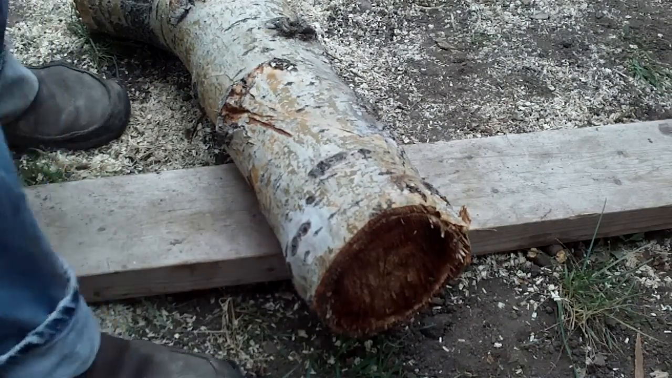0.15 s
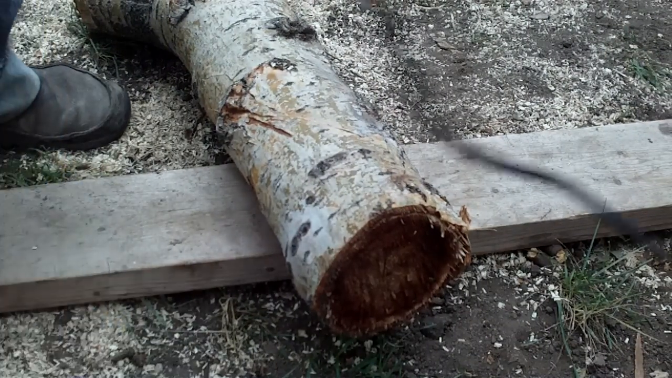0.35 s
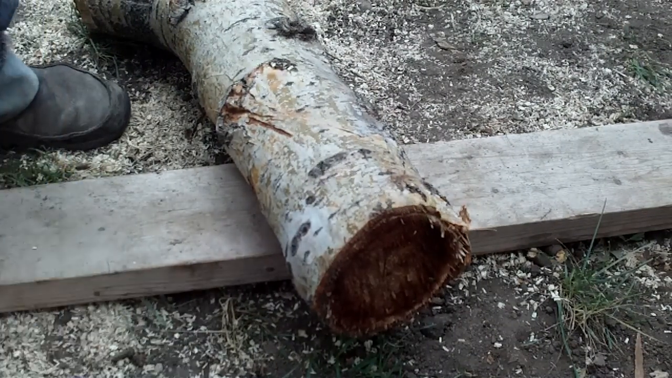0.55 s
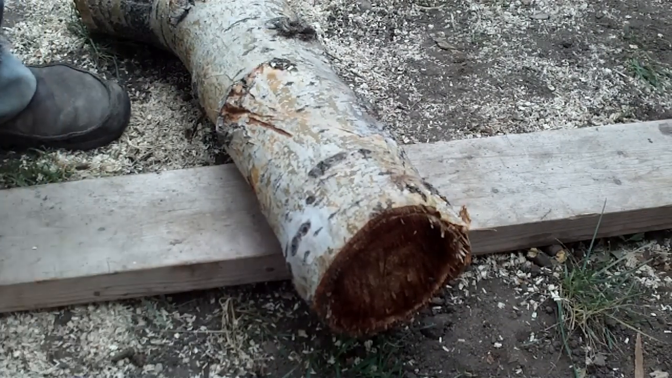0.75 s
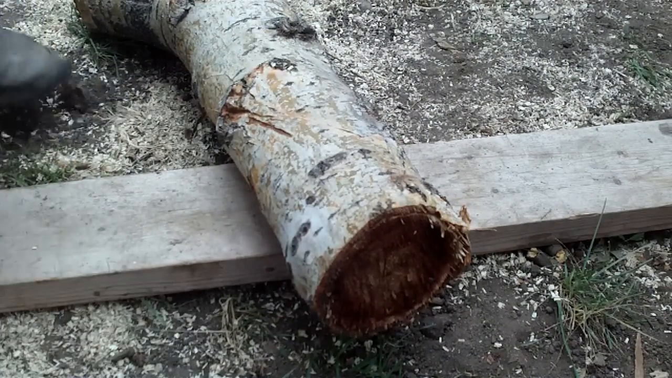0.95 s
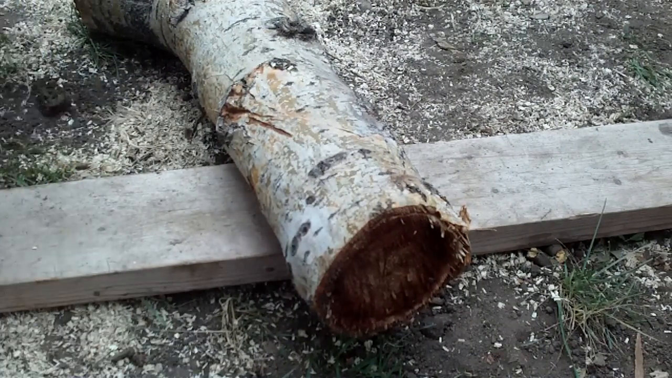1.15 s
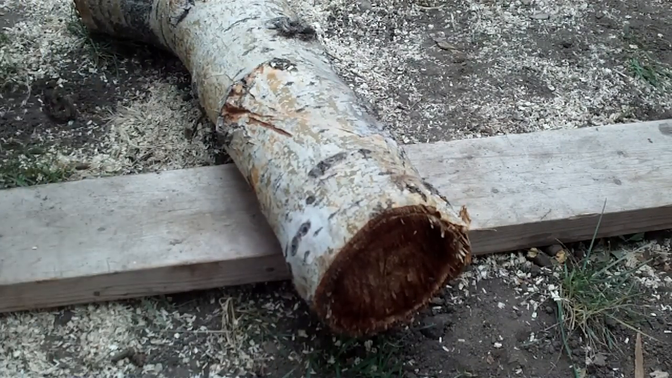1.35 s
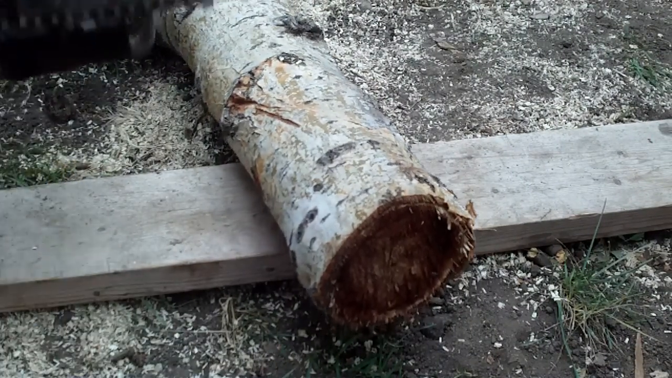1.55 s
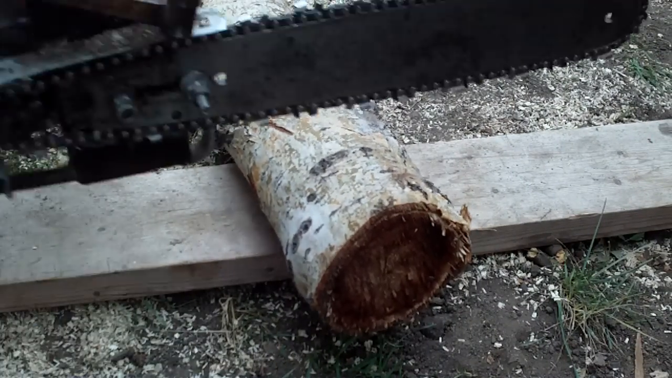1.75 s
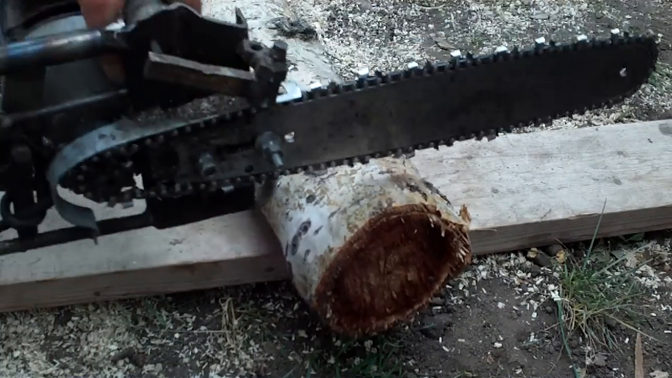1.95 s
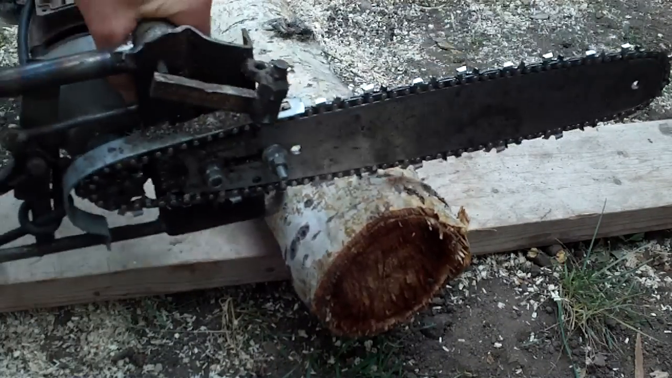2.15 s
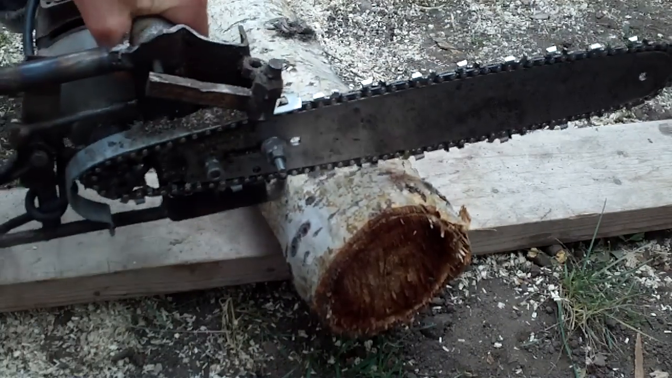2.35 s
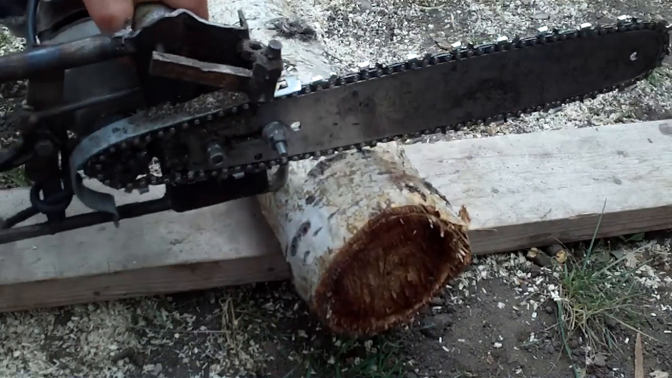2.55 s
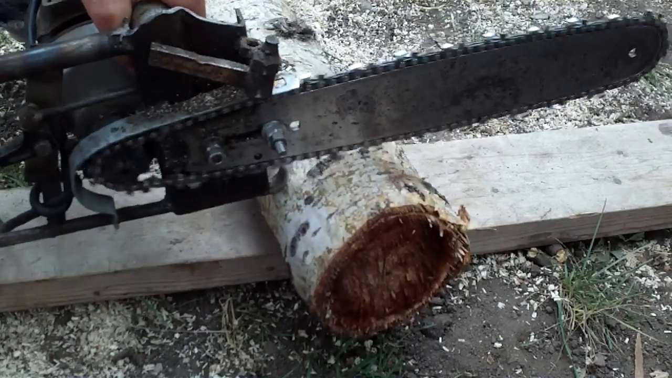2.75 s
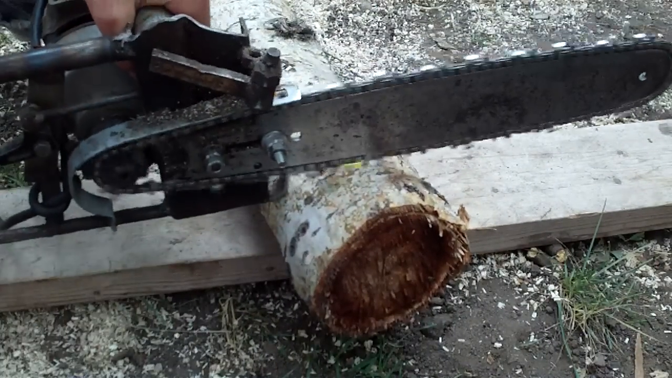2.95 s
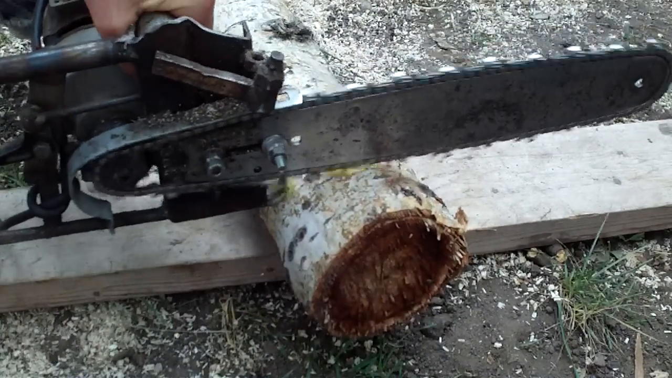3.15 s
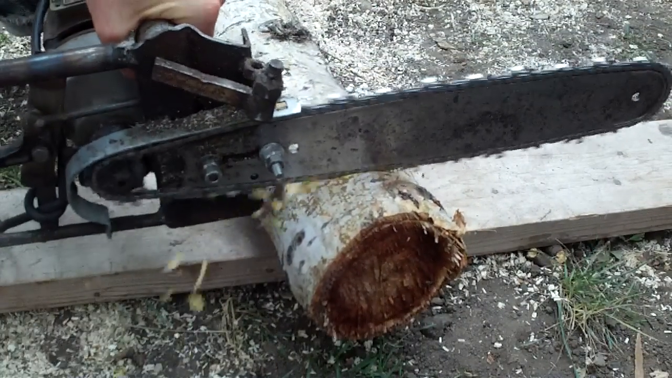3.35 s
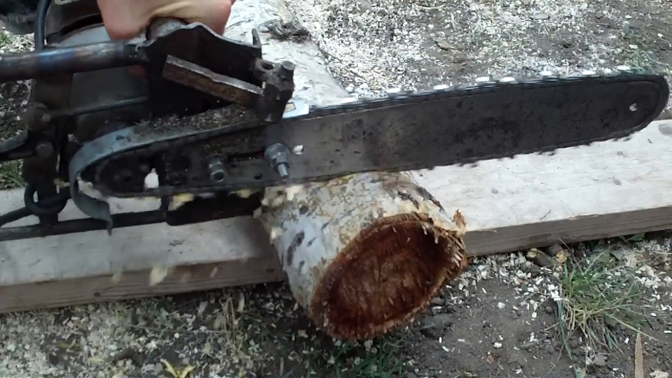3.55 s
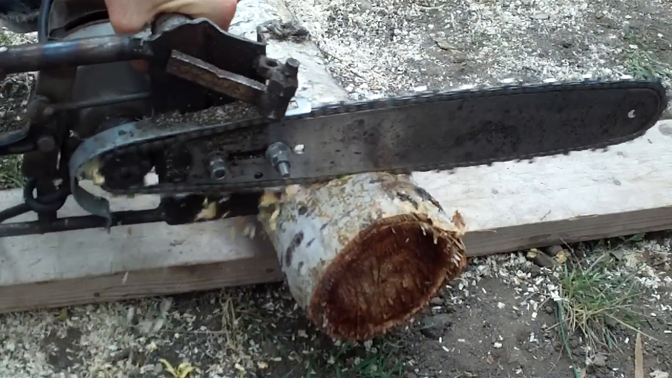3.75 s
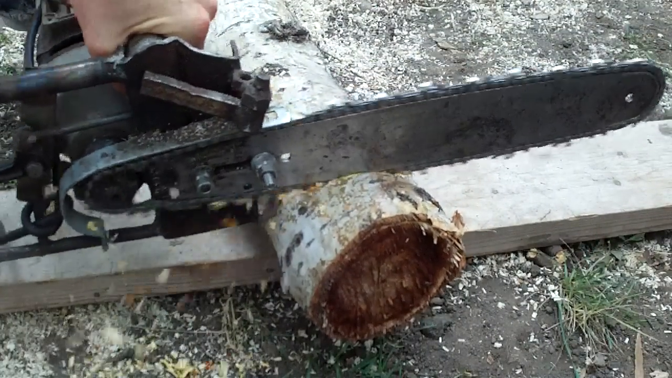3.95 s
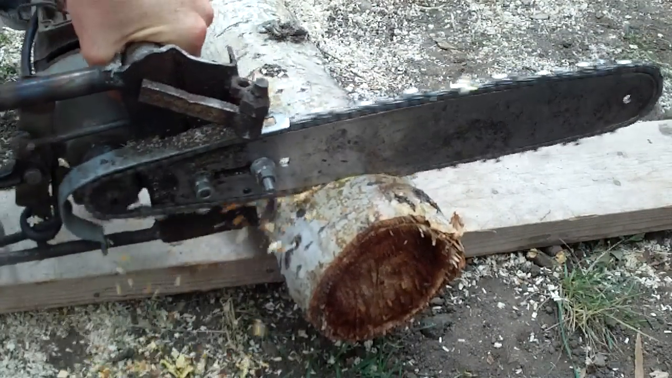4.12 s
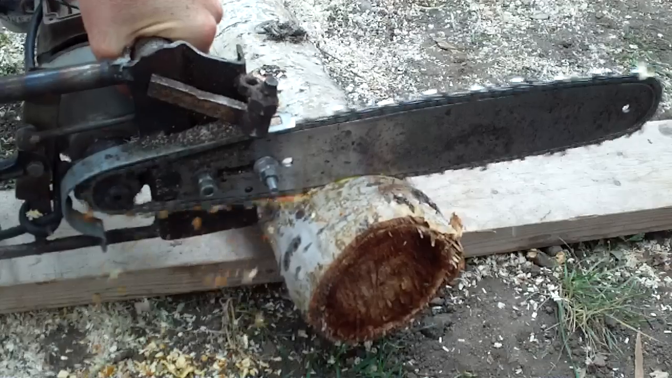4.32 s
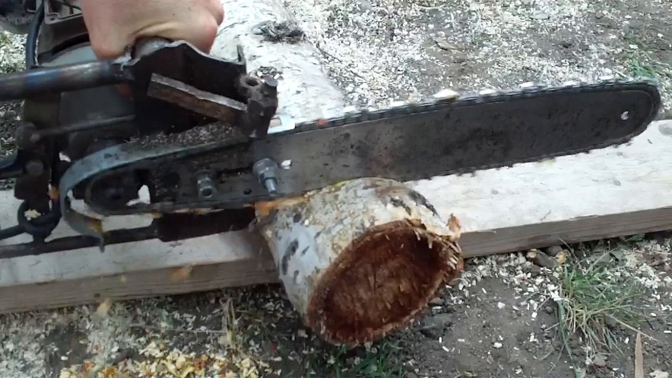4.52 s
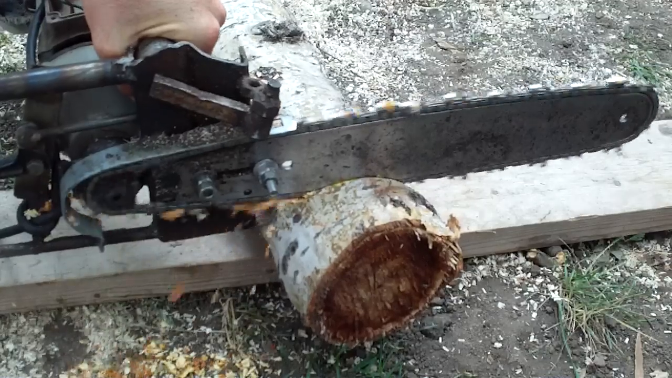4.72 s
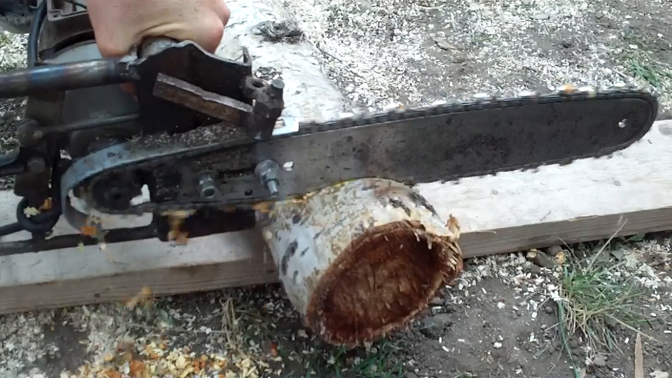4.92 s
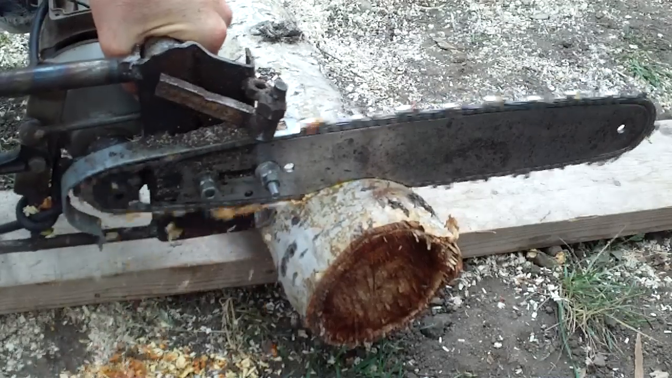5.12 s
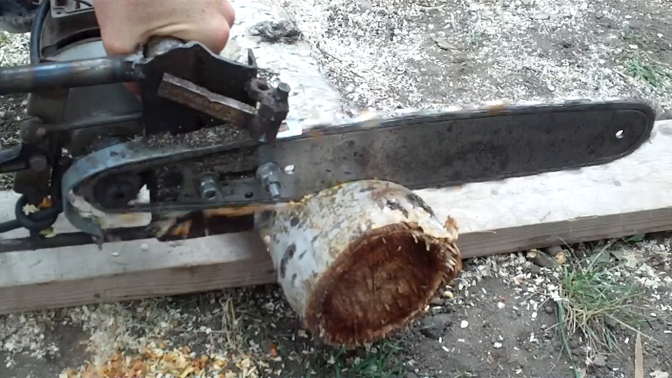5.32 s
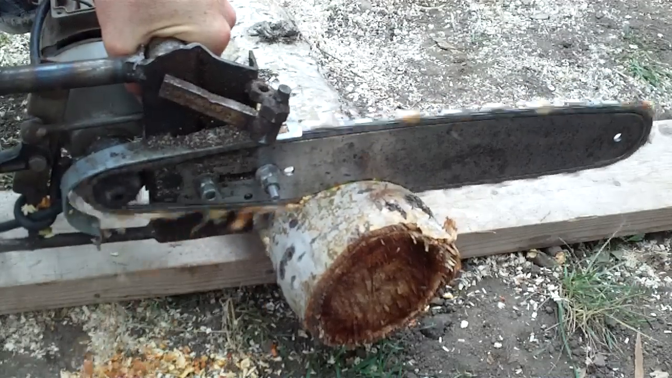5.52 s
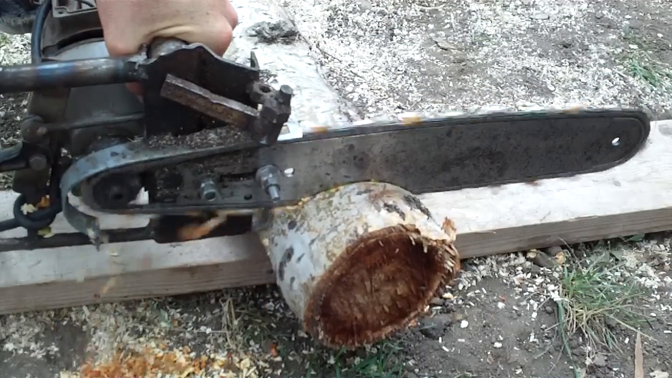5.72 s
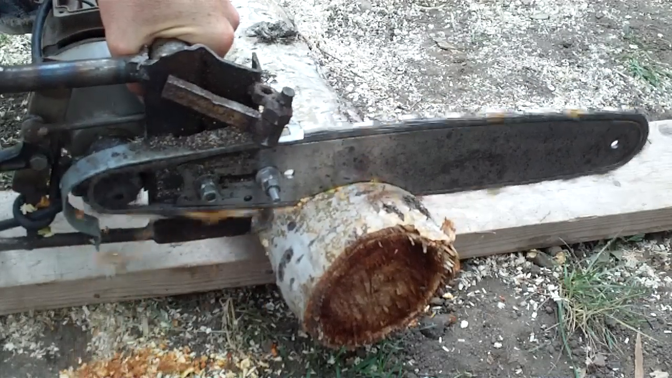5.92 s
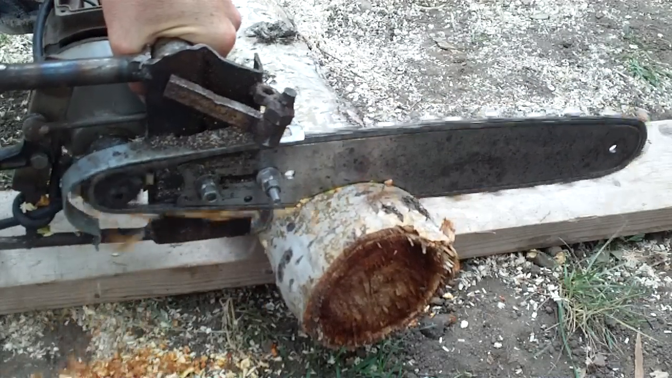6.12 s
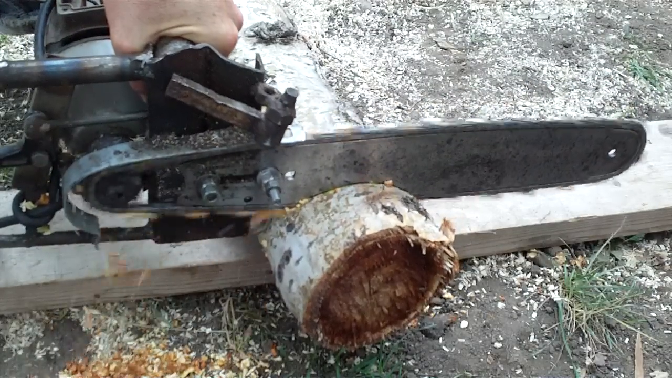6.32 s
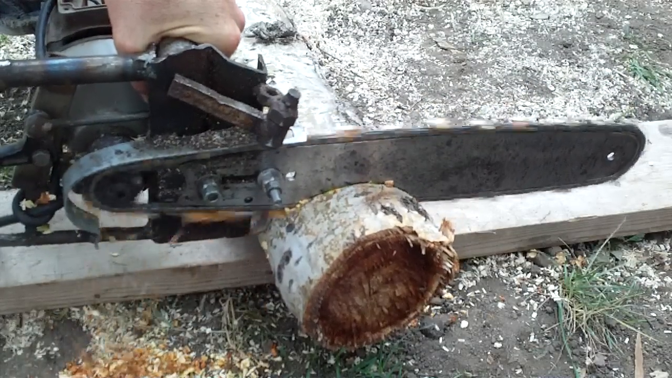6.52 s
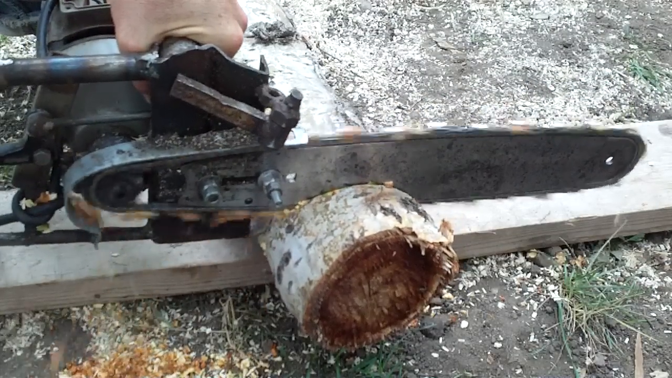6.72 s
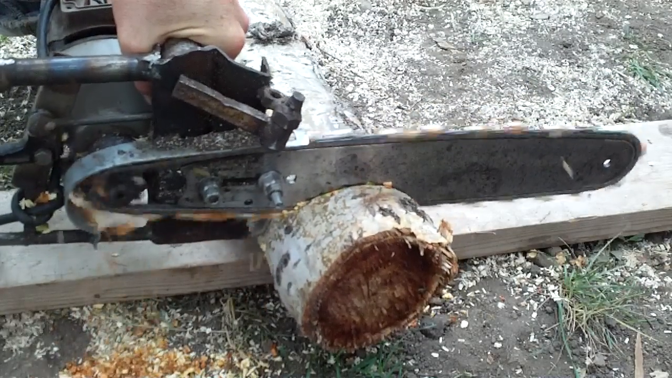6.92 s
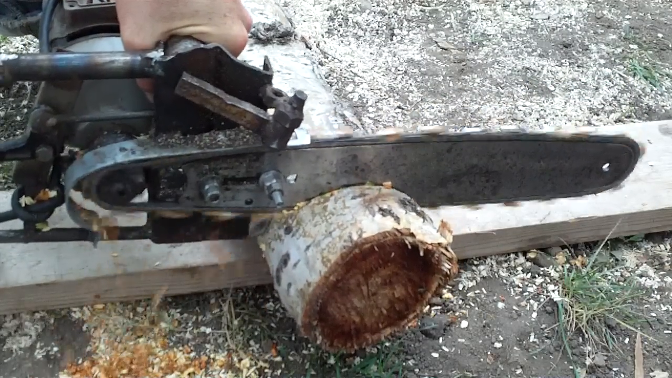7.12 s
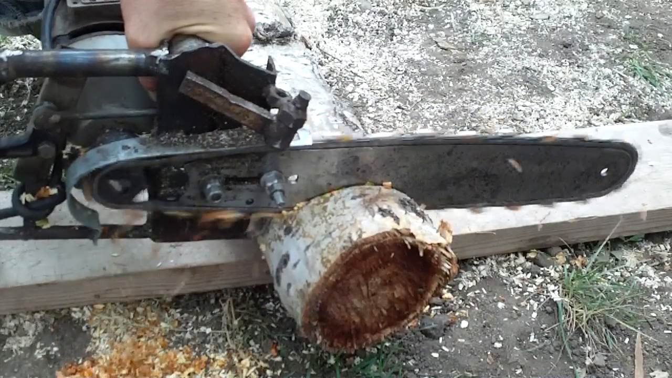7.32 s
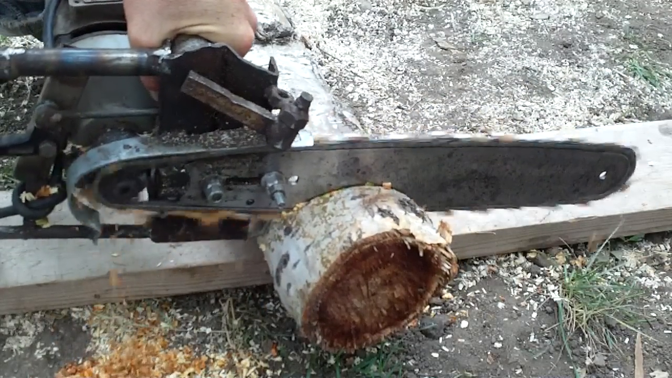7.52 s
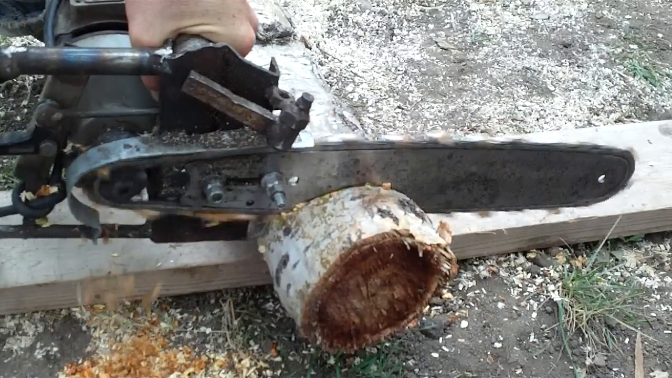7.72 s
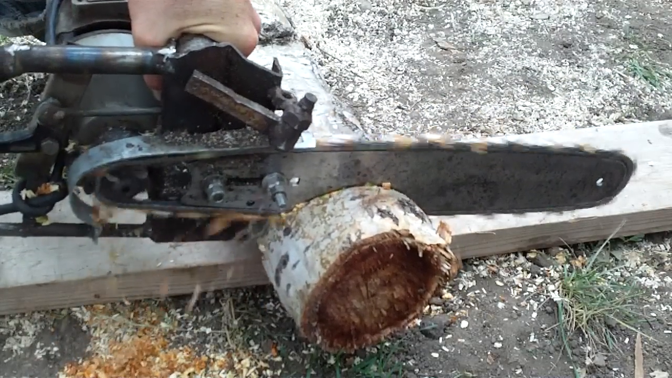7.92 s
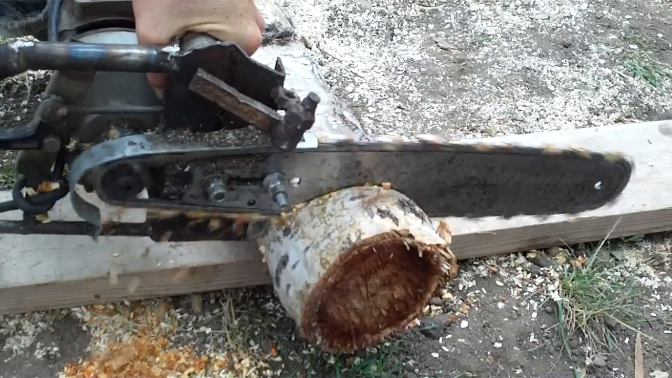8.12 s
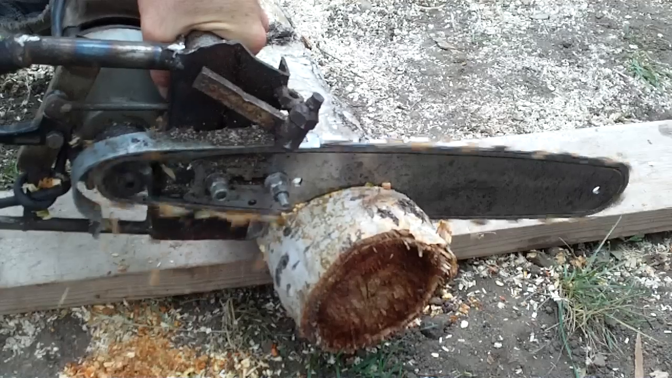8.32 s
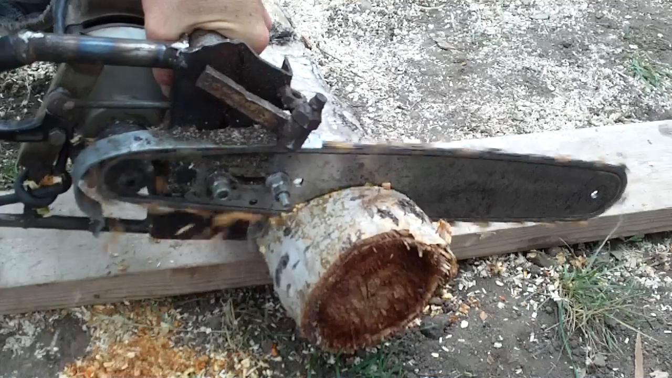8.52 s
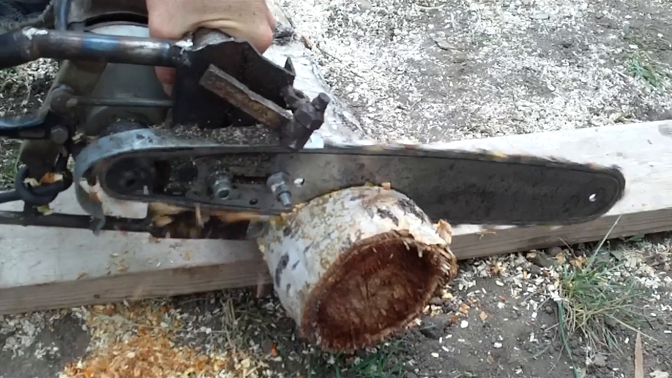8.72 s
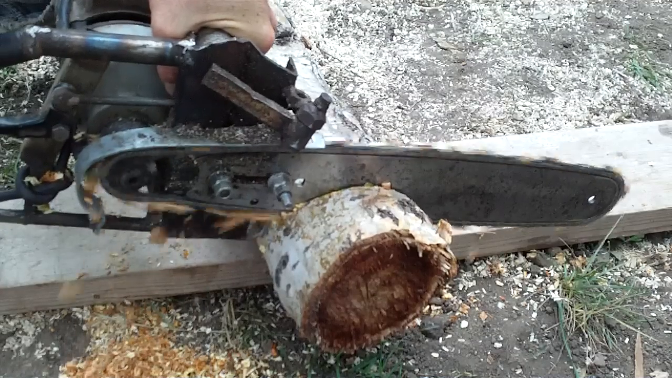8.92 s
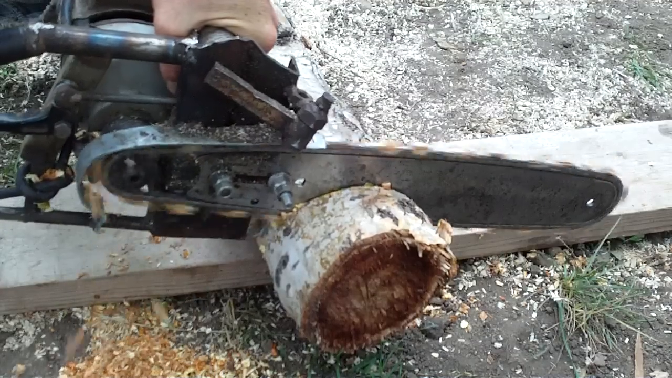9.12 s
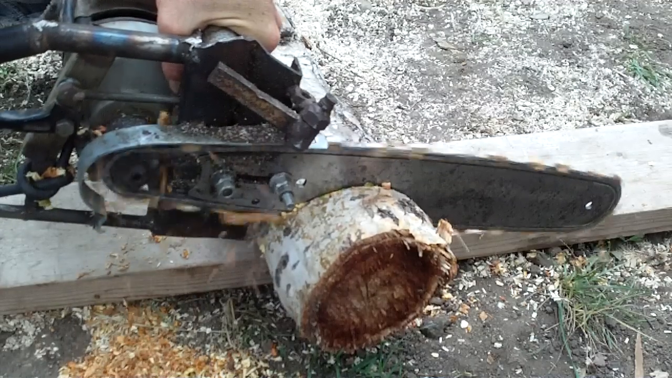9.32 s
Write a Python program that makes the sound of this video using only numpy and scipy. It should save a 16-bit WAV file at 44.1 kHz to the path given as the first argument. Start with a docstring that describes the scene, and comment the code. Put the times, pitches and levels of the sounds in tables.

```python
"""A generator idles in a yard, its hum swelling and fading irregularly throughout; far noise lies beneath.
First a homemade electric chainsaw is handled: filtered-noise clicks, ringing steel, rustle, sparrows' sine chirps.
At 2.7 s it is switched on: its motor runs up and whines on commutator, gear and shaft orders over rattle and hiss.
From 3.15 s the chain bites into a log: the pitch sags, the gear lines grow and the chain jolts. One microphone."""
import sys
import numpy as np
from scipy import signal
from scipy.fft import rfft, irfft, next_fast_len
from scipy.io import wavfile
from scipy.ndimage import uniform_filter1d, map_coordinates

SR = 44100
rng = np.random.default_rng(int(sys.argv[2]) if len(sys.argv) > 2 else 0)


def elevation(decibels):
    """Turn decibel levels (scalar or array-like) into linear amplitude ratios."""
    levels = np.asarray(decibels, float)
    return 10 ** (levels / 20)


def materialize(psi):
    """Save the field psi as 16-bit PCM at rate SR to the path in sys.argv[1].

    A 1-D psi becomes a single channel; in a 2-D psi each row is a channel.
    """
    bounded = np.clip(np.atleast_2d(psi).T, -1, 1)
    quanta = np.round(bounded * 32767).astype(np.int16)
    wavfile.write(sys.argv[1], SR, quanta)


N = 417186
T = np.arange(N) / SR
TOP_HZ = 16000
SWITCH_S, RUNUP_S = 2.702, 0.168  # switch-on, time constant of the run-up
FREE_HZ = 3357  # no-load commutator pitch, the aim of the run-up
BARS = 12  # commutator bars
SINCE_S = np.maximum(T - SWITCH_S, 1e-4)


def unit(x):
    """Scale to rms 1."""
    return x / np.sqrt(np.mean(x ** 2) + 1e-20)


def curves(rows):
    """One value per sample for each column after the time."""
    s, *cols = np.transpose(rows)
    return [np.interp(T, s, c) for c in cols]


def along(points, hz):
    """Read (Hz, dB) points on a log frequency axis."""
    f, db = np.transpose(points)
    return np.interp(np.log(hz + 1), np.log(f + 1), db)


def wobble(rate):
    """Smooth random curve, rate knots a second."""
    return map_coordinates(rng.standard_normal(int(N * rate / SR) + 4), [T * rate])


def coloured(x, spectrum):
    """Filter x through (Hz, dB) points, rms 1."""
    m = next_fast_len(N + 8192)
    f = np.fft.rfftfreq(m, 1 / SR)
    gain = elevation(along(spectrum, f)) * (f < TOP_HZ - 200)
    return unit(irfft(rfft(x, m) * gain, m)[:N])


def banded(count, lo_hz, hi_hz, order):
    """Burst of band noise, rms 1."""
    band = signal.butter(order, [lo_hz, min(hi_hz, TOP_HZ)], "bandpass", fs=SR, output="sos")
    return unit(signal.sosfilt(band, rng.standard_normal(count)))


def patchy(depth_db):
    """White noise with patches of random gain in time and frequency."""
    z = signal.stft(rng.standard_normal(N + 512), nperseg=512)[2]
    field = uniform_filter1d(rng.standard_normal(z.shape), size=5, axis=0)
    field = uniform_filter1d(field, size=10, axis=1)
    return signal.istft(z * elevation(depth_db * unit(field)), nperseg=512)[1][:N]


def tone(phase, db, flutter_db, blur_rad):
    """Sine with fluttering level and wandering phase."""
    level = np.sqrt(2) * elevation(db + flutter_db * wobble(35))
    return level * np.sin(phase + blur_rad * wobble(60) + rng.uniform(0, 2 * np.pi))


def motor_speed():
    """Commutator pitch [Hz]: exponential run-up, capped by the load of the cut."""
    # cap set by the load: (time [s], commutator pitch [Hz])
    loaded = [(3.3, 3250), (3.44, 3247), (3.66, 3169), (4.04, 3137), (4.17, 3094), (4.23, 3010),
              (4.5, 2962), (4.53, 2937), (4.76, 2910), (5.0, 2916), (5.14, 2920), (5.44, 2840), (5.5, 2796),
              (5.56, 2744), (5.65, 2797), (5.73, 2798), (5.84, 2783), (6.25, 2791), (6.39, 2821),
              (6.61, 2795), (6.82, 2773), (6.89, 2685), (6.94, 2677), (7.01, 2720), (7.12, 2743),
              (7.3, 2698), (7.37, 2660), (7.45, 2697), (7.62, 2671), (7.74, 2730), (7.83, 2733),
              (7.88, 2709), (8.26, 2652), (8.36, 2600), (8.45, 2677), (8.58, 2680), (8.74, 2628),
              (8.79, 2630), (8.89, 2656), (8.95, 2650), (9.08, 2729), (9.17, 2749), (9.29, 2758),
              (9.46, 2720)]
    return np.minimum(FREE_HZ * (1 - np.exp(-SINCE_S / RUNUP_S)), curves(loaded)[0])


def motor_whine(hz, phase, bite):
    """Commutator harmonics radiated by the casing, mesh harmonics by the gear cover."""
    # casing radiation of commutator lines: (frequency [Hz], level [dB])
    casing = [(500, -52), (950, -40), (1250, -16), (1600, -23), (1870, -22), (2120, -28), (2330, -34),
              (2450, -13.5), (2550, -24), (2660, -21.5), (2760, -20.5), (2800, -22.5), (2840, -20.5),
              (3000, -24), (3060, -18.5), (3120, -20.5), (3190, -21), (3250, -15.5), (3450, -28.5),
              (4200, -26), (5230, -25.5), (5450, -24.5), (5660, -19.5), (5720, -26), (5765, -51),
              (5810, -24.5), (5900, -22.5), (6000, -22), (6200, -27.5), (6300, -20.5), (6500, -21),
              (7100, -28), (7800, -25), (8050, -28), (8300, -28), (8750, -37.5), (9000, -33), (9250, -39),
              (9450, -31), (9750, -40), (10500, -38), (11000, -30.5), (11250, -36), (11600, -32),
              (11850, -41), (12000, -34), (12600, -40), (13000, -33), (13300, -38), (14000, -37),
              (14200, -28), (14600, -21.5), (14900, -29), (15600, -30), (15900, -50)]
    # gear cover radiation of mesh lines: (frequency [Hz], level [dB])
    gearbox = [(1500, -50), (1960, -24.5), (2050, -21.5), (2130, -28), (2190, -28.5), (2230, -53),
               (2310, -31), (2355, -21.5), (2430, -30), (3900, -44), (4050, -41), (4150, -37),
               (4250, -33.5), (4400, -40), (4700, -45), (4870, -37), (5900, -53), (6000, -38), (6150, -37),
               (6270, -48), (6430, -31), (6570, -43), (6750, -34), (7000, -50)]
    # brush seating as the saw is leant and rocked: (time [s], even over odd harmonics above the first [dB])
    seating = [(3.0, -1), (3.15, 5), (3.25, -27), (3.4, 5.5), (3.7, -2), (4.0, -0.5), (5.2, 4.5),
               (6.0, -2.5), (6.9, -1.5), (7.3, -12), (7.5, -10), (8.2, -0.5), (8.45, 2), (8.85, -6),
               (9.05, 3.5), (9.46, 5.5)]
    mesh = 0.75  # gear mesh over commutator pitch
    sharp_hz, sharpen = 2600, 0.94  # below this pitch upper harmonics weaken; power of speed
    lost_hz, width_hz, lost_db = 2901, 127, -14.5  # resonance damped by pressing on the log
    dull_db = sharpen * 20 * np.log10(np.minimum(hz / sharp_hz, 1))
    even_db, = curves(seating)
    lines = []
    for k in range(1, 6):
        seat_db = even_db * (0.65 if k % 2 == 0 else -0.35 * (k > 1))
        damp_db = bite * lost_db * np.exp(-((k * hz - lost_hz) / width_hz) ** 2)
        lines.append((k, along(casing, k * hz) + (k - 1) ** 1.3 * dull_db + seat_db + damp_db))
    for k in range(1, 4):  # gear teeth sing under load
        lines.append((k * mesh, along(gearbox, k * mesh * hz) - 10 * (1 - bite) + dull_db))
    rising_db = -13.5 * np.exp(-SINCE_S / RUNUP_S)  # lines firm up over the run-up
    whine = np.zeros(N)
    for k, db in lines:
        whine += tone(k * phase, db + rising_db + 1.6 * wobble(2.514), 1.31, 0.37 * k) * (k * hz < TOP_HZ)
    return whine


def shaft_lines(hz, phase, rattle_db):
    """Weak multiples of the shaft rate, slowly wavering, louder as the motor turns faster."""
    # orders of the shaft rate [1]
    faint = [1, 22, 26, 30, 38, 45, 50, 55, 57, 59]
    # their levels over the rattle [dB]
    faint_db = [-24.5, -19, -45, -28, -25, -30, -26, -18, -27, -27]
    out = np.zeros(N)
    for k, db in zip(faint, faint_db):
        level_db = db + rattle_db + 1.8 * wobble(1.22)
        out += tone(k * phase / BARS, level_db, 1.4, 0.5) * (k * hz / BARS < TOP_HZ)
    return out


def chain_rattle(ticks, rattle_db):
    """Chain and bar: patchy noise and cutter ticks through one spectrum."""
    # (frequency [Hz], relative density [dB per Hz])
    spectrum = [(40, -40), (80, -20), (200, -15.5), (335, -9), (393, -13.5), (807, -3), (979, -3.5),
                (1100, -14), (1340, -3), (1600, -13.5), (1880, -15.5), (2210, -14), (2600, -13),
                (3380, -34), (5720, -120)]
    return coloured(patchy(1.14) + 0.39 * ticks, spectrum) * elevation(rattle_db + 0.34 * wobble(13))


def air_hiss(hz, phase, bite, speed_db, ticks):
    """Fan and brush noise growing with speed, chips with lost speed, sparks at the start."""
    # (frequency [Hz], relative density [dB per Hz])
    spectrum = [(1060, -18.5), (1800, 2.5), (2600, -7.5), (2980, -3.5), (3410, -7.5), (4350, -5.5),
                (4720, -2.5), (5160, -6), (6300, -5), (7080, -9.5), (8250, -7), (9440, -10), (10800, -9),
                (13100, -14), (15500, -16)]
    fan = elevation(-19 + 2.84 * speed_db)
    chips = elevation(-33) * bite * 5 * (1 - hz / FREE_HZ)  # -33 dB at one fifth of speed lost
    # brush sparks under the starting current
    arcing = elevation(-34.5) * np.exp(-SINCE_S / RUNUP_S) * (1 - np.exp(-SINCE_S / 0.02))
    shaft = 1 + 0.13 * np.sin(phase / BARS)  # brushes rub harder once a turn
    noise = coloured(patchy(1.2) * shaft + 0.4 * ticks, spectrum)
    return noise * (fan + chips + arcing) * elevation(0.32 * wobble(14))


def saw():
    """Motor lines, chain rattle and hiss, all driven by the motor speed."""
    bite_s, bite_rise_s = 3.15, 0.29  # chain enters the log
    hz = motor_speed()
    phase = 2 * np.pi * np.cumsum(hz) / SR
    speed_db = 20 * np.log10(hz / FREE_HZ)
    bite = np.clip((T - bite_s) / bite_rise_s, 0, 1)
    rattle_db = -22 + 1.84 * speed_db  # dB at free speed, power of speed
    impulses = (rng.random(N) < 1800 / SR) * rng.standard_normal(N)  # about 1800 a second
    ticks = unit(impulses * elevation(0.59 * wobble(22)))  # cutters
    lines = motor_whine(hz, phase, bite) + shaft_lines(hz, phase, rattle_db)
    noise = chain_rattle(ticks, rattle_db) + air_hiss(hz, phase, bite, speed_db, ticks)
    return (T > SWITCH_S) * (lines + noise)


def clicks():
    """Short noise cracks ringing at their colour, duller ones starting softer, with a low knock."""
    # handling, switch, chain jolts: (time [s], relative level [dB], relative knock level [dB], colour [Hz])
    hits = [(0.1084, -48.5, 13, 4270), (0.588, -29, -17, 1620), (0.7142, -23, -6, 1780),
            (1.0449, -35, -27, 6460), (1.0649, -22, -39, 14900), (1.0864, -35, -21, 14800),
            (1.143, -42, -25, 9000), (1.153, -43, -25, 7000), (1.173, -47, -25, 11000),
            (1.207, -43, -25, 9000), (1.213, -48, -25, 11000), (1.233, -18.5, -22, 9500),
            (1.258, -48, -25, 9000), (1.482, -41.5, 13.5, 1500), (2.0847, -20, -34, 8500),
            (2.1095, -24.5, -13, 6270), (2.217, -34, -20, 2100), (2.251, -43, -20, 2100),
            (2.391, -40, 0, 1903), (2.4333, -36, -16, 3800), (2.4762, -37, -18, 9190),
            (2.4991, -33, -18, 9660), (2.5335, -43, -14, 8480), (2.584, -34, -16, 4390),
            (2.5965, -33, -18, 5660), (2.6928, -31, 2, 12300), (2.7051, -11, -25, 14300),
            (2.718, -34, -18, 9000), (2.728, -30, -14, 6800), (3.134, -11, -22, 3120),
            (4.4169, -1, -9, 5970), (4.5114, -10, -7, 5920)]
    t60_s, rise_cycles = 0.022, 15
    out, t = np.zeros(N + SR), np.arange(SR // 4) / SR
    for s, db, knock_db, hz in hits:
        crack = 1.54 * banded(len(t), 0.37 * hz, 3.4 * hz, order=1)
        crack += 1.7 * banded(len(t), 0.95 * hz, 1.06 * hz, order=1)
        crack *= (1 - np.exp(-t * hz / rise_cycles)) * elevation(-60 * t / t60_s)
        thud = banded(len(t), 350, 1140, order=2) + 0.77 * np.sin(2 * np.pi * 470 * t)
        knock = elevation(knock_db + 2.0 - 60 * t / 0.064) * thud * (1 - np.exp(-t / 0.003))
        out[round(s * SR):][:len(t)] += elevation(db - 11) * (crack + knock)
    return out[:N]


def clanks():
    """Blows on the steel frame: decaying modes, a noise crack and chattering slack links."""
    # (time [s], relative level [dB])
    blows = [(1.641, -9.5), (1.662, -18)]
    # frame modes: (frequency [Hz], mean relative level [dB], t60 [s])
    steel = [(4500, -21, 0.13), (5920, -11, 0.11), (7070, -1, 0.06), (7560, -3.5, 0.082), (9140, -2, 0.14),
             (10270, -35, 0.17), (11100, -28, 0.11), (12040, -17, 0.071), (12420, -0.5, 0.047),
             (12950, -23, 0.08), (13570, -5, 0.044)]
    out, t = np.zeros(N + SR), np.arange(SR // 4) / SR
    rise = 1 - np.exp(-t / 0.0012)
    for s, db in blows:
        ring = np.zeros(len(t))
        for hz, level_db, t60_s in steel:
            ring += elevation(level_db + rng.normal(0, 2.6) - 60 * t / t60_s) * np.sin(2 * np.pi * hz * t)
        crack = banded(len(t), 1400, 16000, order=1) * elevation(-60 * t / 0.051)
        links = 0.32 * banded(len(t), 3500, 4700, order=2) * elevation(-60 * t / 0.11)
        out[round(s * SR):][:len(t)] += elevation(db - 10.5) * rise * (crack + links + 0.86 * ring)
    return out[:N]


def cover_plate():
    """Cover plate set ringing by the switch: decaying narrow-band noise."""
    hz, db, t60_s = 2400, -41, 0.45
    out, t = np.zeros(N), np.arange(SR // 4) / SR
    ring = elevation(db - 60 * t / t60_s) * banded(len(t), hz - 50, hz + 50, order=1)
    out[round(SWITCH_S * SR):][:len(t)] += ring
    return out


def birds():
    """Sparrows: curved, slightly hoarse sine whistles with a weak octave."""
    # (time [s], start [Hz], middle [Hz], end [Hz], relative level [dB])
    notes = [(.0, 6040, 5280, 4000, -51.5), (0.05, 3820, 4330, 4300, -57), (.912, 8400, 7850, 7760, -59),
             (1.025, 4000, 6030, 6500, -55), (1.258, 2800, 3050, 3100, -65),
             (1.427, 4600, 5900, 4000, -48.5), (1.515, 3970, 5240, 4000, -52.5),
             (1.885, 5200, 4600, 3600, -62), (2.139, 4280, 5780, 3900, -48.5),
             (2.214, 3595, 4950, 3800, -52.5), (2.608, 5500, 5000, 3480, -55)]
    note_s = 0.042
    out = np.zeros(N)
    for s, start_hz, top_hz, end_hz, db in notes:
        u = (np.arange(int(note_s * SR)) / (note_s * SR)) ** 0.75  # glides faster at first
        bow_hz = 2 * top_hz - (start_hz + end_hz) / 2  # puts the curve through top_hz
        hz = (1 - u) ** 2 * start_hz + 2 * u * (1 - u) * bow_hz + u ** 2 * end_hz
        phase = 2 * np.pi * np.cumsum(hz) / SR
        # fainter, farther birds are more smeared
        phase += (0.37 + 0.049 * (-49.5 - db)) * banded(len(u), 100, 560, order=1)
        whistle = np.sin(phase) + 0.22 * np.sin(2 * phase)
        out[round(s * SR):][:len(u)] += elevation(db) * np.sin(np.pi * u) ** 0.31 * whistle
    return out


def walls(x, t60_s, gap_s):
    """Diffuse tail from the yard walls: convolution with decaying noise after a gap."""
    t = np.arange(SR // 2) / SR
    tail = rng.standard_normal(len(t)) * elevation(-60 * t / t60_s) * (t > gap_s)
    return signal.fftconvolve(x, tail / np.linalg.norm(tail))[:N]


def generator():
    """Exhaust orders of a small engine and its alternator hum, swelling irregularly while odd orders fade."""
    # speed: (time [s], second harmonic of the hum [Hz])
    idle = [(0.0, 211.3), (1.1, 218), (1.6, 215.8), (4.4, 217.7)]
    # (engine order [1], level [dB]; odd orders relative to odd_db)
    exhaust = [(1, -2), (2, -40.5), (3, -3), (4, -71), (5, 0), (6, -49), (7, -11.5), (9, -16)]
    # hum fundamental: (time [s], level [dB])
    swell = [(0, -46), (.45, -41.5), (.9, -44.5), (2.5, -43.5), (3.45, -40), (4.37, -47), (4.9, -40),
             (6.3, -57), (6.85, -36), (7.53, -56), (7.9, -41), (8.17, -60), (8.96, -42.5), (9.46, -59)]
    hum_order = 4.11  # hum over firing rate
    hum = np.pi * np.cumsum(curves(idle)[0]) / SR
    odd_db = -46 - 1 * T  # fades 1 dB a second
    octave_db = -53.5 + 6 * np.exp(-((T - 3.2) / 1.33) ** 2)  # loudest soon after the saw starts
    # (phase [rad], level [dB], unsteadiness)
    lines = [(k * hum / hum_order, db + odd_db * (k % 2), k) for k, db in exhaust]
    lines += [(hum, curves(swell)[0], 4), (2 * hum, octave_db, 8)]
    lines += [(3 * hum, -67, 8), (4 * hum, -73, 8), (5 * hum, -72, 8)]
    out = np.zeros(N)
    for phase, db, k in lines:
        level = np.sqrt(2) * elevation(db + 0.2 * k * wobble(3.9))
        out += level * np.sin(phase + 0.15 * k * wobble(5) + k * k)
    return out


def moving_about():
    """Feet, clothes and cable on the ground: low and high noise swelling with each move."""
    # (time [s], length [s], relative low shuffle level [dB], relative high rustle level [dB])
    shuffle = [(.2, 0.25, -56, -54), (.7, 0.14, -56, -58), (1.1, 0.12, -62, -60), (1.62, 0.19, -61, -59),
               (2.55, 0.46, -60, -58)]
    # low shuffle: (frequency [Hz], relative density [dB per Hz])
    soil = [(180, -25), (300, 0.5), (346, -17), (426, -13), (813, -12), (3500, -26), (4550, -54),
            (7700, -120)]
    # high rustle: (frequency [Hz], relative density [dB per Hz])
    cloth = [(1760, -38), (3000, -8), (8350, -5), (9070, -3), (11300, -6), (15500, -4)]
    low, high = np.full(N, elevation(-66)), np.full(N, elevation(-74))  # floor between moves
    for s, length_s, low_db, high_db in shuffle:
        swell = np.exp(-((T - s) / length_s) ** 2)
        low += elevation(low_db) * swell
        high += elevation(high_db) * swell
    grit = (rng.random(N) < 400 / SR) * rng.standard_normal(N)
    rustle = coloured(patchy(1.8) + 0.4 * unit(grit), cloth)
    return low * elevation(-6) * coloured(patchy(2.5), soil) + high * elevation(-9) * rustle


def yard():
    """Far outdoor noise: patchy noise through a falling spectrum."""
    # (frequency [Hz], relative density [dB per Hz])
    spectrum = [(12, -30), (25, -6), (60, -8), (120, -12), (200, -15), (270, -22.5), (480, -28),
                (1400, -38), (5000, -43), (15900, -54)]
    return elevation(-49) * coloured(patchy(1.0), spectrum)


def scene():
    """Sum all sources at one microphone, same signal on both channels."""
    hands = clicks() + clanks() + cover_plate()
    song = birds()
    mono = saw() + hands + elevation(-15.5) * walls(hands, 0.2, 0.0042)
    mono += 1.2 * song + elevation(2) * walls(song, 0.39, 0.004)
    return np.tile(mono + generator() + moving_about() + yard(), (2, 1))


def low_pass(x):
    """Removes everything above the highest recorded frequency."""
    return signal.sosfilt(signal.butter(12, 16760, fs=SR, output="sos"), x)


def record(dry):
    """The input stage rounds off the highest peaks."""
    mix = dry / (1 + np.abs(dry / 0.93) ** 4) ** (1 / 4)
    return low_pass(mix)


dry = scene()
out = record(dry)
materialize(out)
```